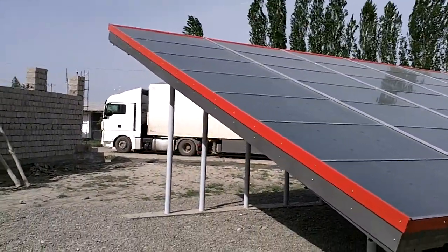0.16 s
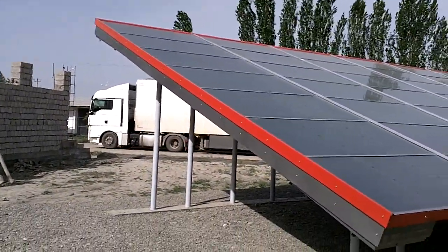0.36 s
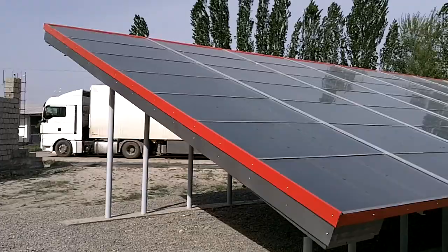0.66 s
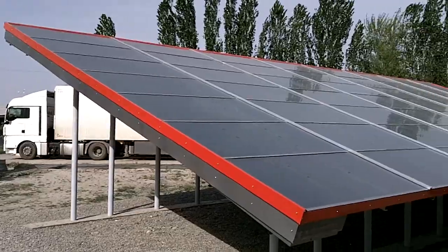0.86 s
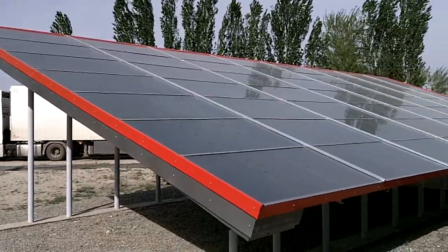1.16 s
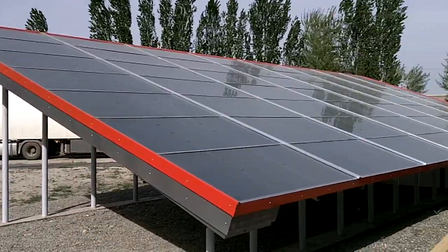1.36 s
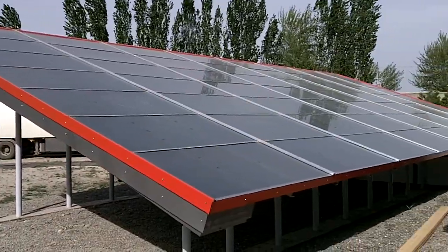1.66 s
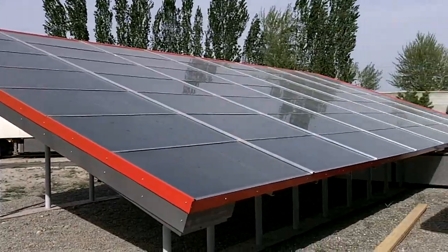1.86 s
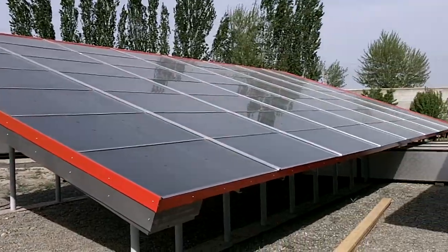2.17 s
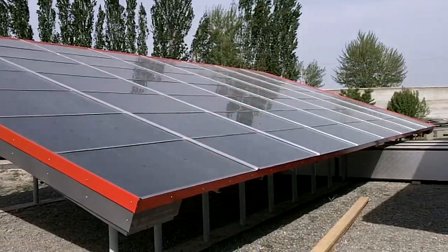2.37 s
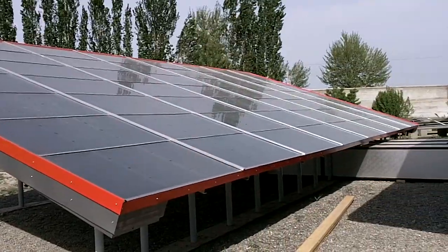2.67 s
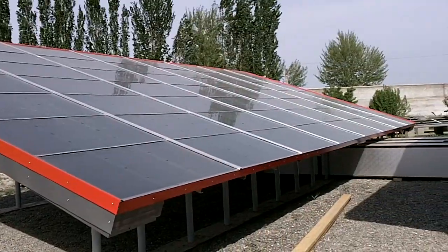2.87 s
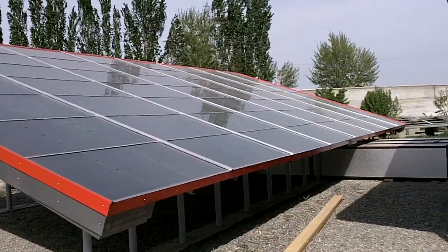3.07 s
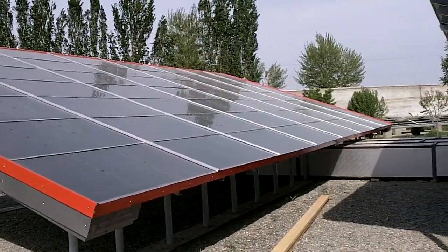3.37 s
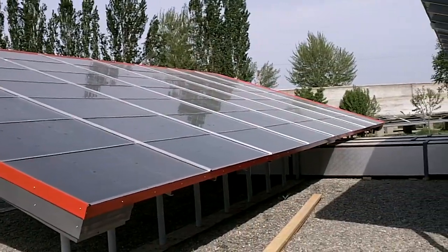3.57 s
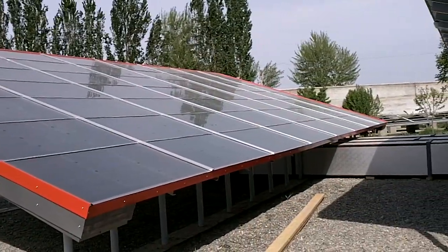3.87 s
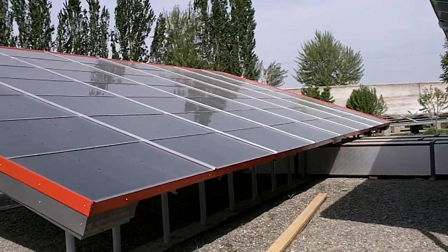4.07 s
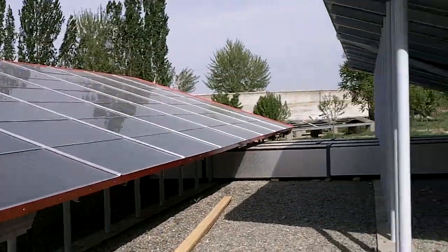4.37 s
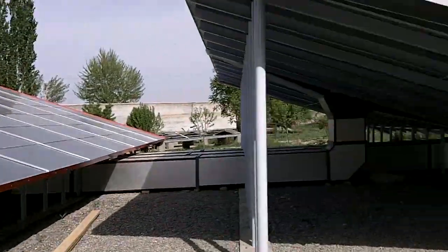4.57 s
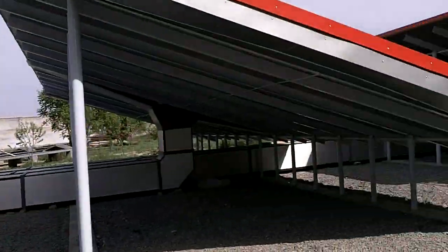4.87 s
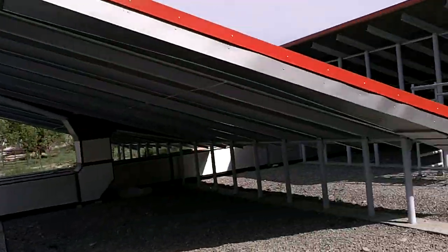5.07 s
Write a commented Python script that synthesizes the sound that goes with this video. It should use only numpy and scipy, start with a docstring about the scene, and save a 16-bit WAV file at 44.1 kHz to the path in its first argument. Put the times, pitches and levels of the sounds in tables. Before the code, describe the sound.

Near solar panels in a gravel yard, faint hiss and wind open the scene, with barely audible distant tones. Seven short, hollow, footstep-paced knocks follow from 1.7 to 4.9 seconds, mostly growing stronger, with brief rattling bounces and a short open-air tail. One microphone picks up a gust midway and rough, booming wind bursts in the last half second.

```python
"""A windy yard: seven hollow thuds sound, as on a frame clad with a thin sheet.
Each thud is a slow swinging boom plus quick ringing modes, with a blow and three bounces.
Weaker repeats first carry on the boom's ring, then echo it; a scattered tail and low shudder follow.
Wind noise rumbles, flutters and bursts on one microphone; notched hiss and faint tones lie behind.
"""
import sys
import numpy as np
from scipy import signal
from scipy.fft import rfft, irfft, next_fast_len
from scipy.io import wavfile
from scipy.ndimage import uniform_filter1d

SR = 44100
rng = np.random.default_rng(int(sys.argv[2]) if len(sys.argv) > 2 else 0)


def pcm_store(signal):
    """Save signal as 16-bit PCM."""
    levels = np.round(np.clip(np.atleast_2d(signal), -1, 1) * 32767)
    wavfile.write(sys.argv[1], SR, levels.astype(np.int16).T)


N = 230554

# The seven thuds: t/s, boom level/dB, crack level/dB, clack level/dB, treble change of the repeats/dB,
# tilt of the quick modes/(dB per octave), bounce change/dB, change of the upper boom modes/dB
THUDS = [(1.6682, -31, -34, -35.5, -7, -1, .5, 0), (2.382, -27.5, -23.5, -31, -1, 1, -0.3, -5),
         (2.89, -26.5, -25.5, -31, 3, -0.5, 1, -2), (3.3725, -25.5, -34, -29.5, 0.5, 0, 3.5, 1),
         (3.869, -24.5, -23.5, -28, 5.5, 0.8, 0.5, 1), (4.375, -23, -18.5, -28.5, 3, -0.2, .1, 1),
         (4.873, -22, -25.5, -35, -0.5, -4, 4, 0.3)]
# Slow modes of the sheet: f/Hz, level/dB, time of greatest swing/s
BOOM_MODES = [(112.7, 2, 0.011), (198, -13, 0.021), (301, -15.5, 0.014), (398.4, -16.5, 0.0094),
              (462, -13.5, 0.011), (565.6, -14, 0.011)]
# Lower quick modes: f/Hz, level/dB, time to fall 60 dB/s
CLACK_MODES = [(668, 2.5, 0.044), (757, -3, 0.043), (906, 0.5, 0.037), (973, -0.5, 0.06),
               (1102, 3.5, 0.029), (1198, 0, 0.047), (1397, -2, 0.055)]
# Higher quick modes: f/Hz, level/dB, time to fall 60 dB/s
CRACK_MODES = [(1535, 2.5, 0.016), (1670, -34, 0.015), (1795, -4.5, 0.058), (1915, 0, 0.033),
               (2017, 1.5, 0.021), (2150, 3, 0.016), (2350, -10, 0.068), (3285, -8, 0.021)]
# The blow and its bounces: t after the blow/s, level/dB
CONTACTS = [(0, 2.4), (.0065, -1.5), (.0215, -11.5), (0.04, -13)]
# Delays of weaker repeats: the first two carry on the boom's ring, later ones are echoes: t/s
REPEAT_DELAYS = [.036, .072, .137, .19]
# Strength of those repeats, in the same order: boom level/dB, treble level/dB
REPEAT_LEVELS = [(-14, -35), (-13.5, -19), (-13.5, -16.5), (-23.5, -29)]
# Scattered tail of the yard: f/Hz, level/dB, time to fall 60 dB/s
YARD_TAIL = [(100, -31, 0.69), (198, -13.5, 0.38), (400, -11, 0.2), (700, -9.5, 0.1), (1510, -10, 0.51),
             (3000, -8.5, 0.79)]
# Slowly changing wind on the microphone, strongest near the end: t/s, rumble level/dB
WIND_STRENGTH = [(0, -52.5), (1.5, -52), (1.95, -49), (2.3, -51), (2.9, -46), (3.3, -40.5), (3.8, -44),
                 (4.4, -47.5), (4.75, -38), (5.0, -28.5), (5.23, -31)]
# Gusts riding on the wind: t of greatest strength/s, rumble level/dB, length/s
GUSTS = [(.04, -47.5, .04), (3.109, -43, 0.033), (3.244, -35.5, 0.066), (3.502, -45, 0.094),
         (4.238, -44.5, 0.044), (4.69, -50, 0.064), (4.921, -23, 0.1), (5.022, -25, 0.033),
         (5.129, -26, .04), (5.177, -23, .04)]
# Colour of the wind rumble: f/Hz, level/dB
RUMBLE_COLOUR = [(12, -12.5), (25, 1), (50, -4.5), (80, -4.5), (120, -12.5), (200, -20.5)]
# Colour of the flutter and the shudder: f/Hz, level/dB
FLUTTER_COLOUR = [(40, -28), (90, -3), (150, 0.9), (300, -5.5), (500, -11), (900, -25)]
# Single eddies on the microphone port: t of peak/s, peak level/dB, length/s, push +1 or pull -1
BUFFETS = [(0.202, -35, 0.0075, 1), (4.838, -18.5, 0.0034, 1), (4.92, -16, 0.0046, 1),
           (4.938, -19, 0.0082, -1), (5.002, -17, 0.0024, -1), (5.021, -17, 0.0038, -1),
           (5.027, -16.5, 0.0045, 1), (5.115, -15.5, 0.0058, -1), (5.131, -14, 0.0023, -1),
           (5.173, -11.5, 0.0046, -1), (5.188, -15, 0.0133, 1)]
# Strength of the hiss: t/s, bright level/dB, dull level/dB
HISS_LEVELS = [(0.0, -49, -49.5), (0.48, -48.5, -49), (1.92, -50, -49.5), (2.21, -49, -50),
               (4.32, -48, -49), (5.01, -44.5, -47.5), (5.23, -45, -47)]
# Colour of the bright hiss: f/Hz, level/dB
BRIGHT_COLOUR = [(1500, -13), (2600, -10), (3300, -4), (4400, -0.05), (4950, -3.5), (5200, -18),
                 (6000, -16), (6800, -18), (7600, -31.5), (9000, -29), (11500, -26), (13500, -31),
                 (15000, -28)]
# Colour of the dull hiss: f/Hz, level/dB
DULL_COLOUR = [(40, -10), (100, -3.5), (300, -1), (800, -2.4), (1500, -4.5), (2400, -7), (3500, -68)]
# Faint tones of fixed pitch: start t/s, end t/s, f/Hz, level/dB
HOOTS = [(0.346, 0.594, 709, -57.5), (0.96, 1.094, 712, -62.5), (1.223, 1.357, 417, -56)]
# Notches in the microphone path: f/Hz, width/Hz, width of the bottom/Hz
NOTCHES = [(2735, 500, 45), (5500, 260, 40), (8000, 500, 250), (10900, 500, 20), (11000, 500, 20)]

# Sheet snaps back, its swing is damped, and the time scale of that damping
SNAP_S, DAMPED_S, DAMPING_S = .0138, .034, .002
CRACK_LEAD_S = .0008  # the quick modes start this much before the boom
TILT_HZ = 1200  # the tilt turns about this pitch
SHUDDER_DB, SHUDDER_T60_S = -12, 0.75  # level against the boom, time to fall 60 dB
# Flutter stays faint until the rumble passes a level, then climbs (slope in dB per dB)
FLUTTER_CALM_DB, FLUTTER_FROM_DB, FLUTTER_SLOPE = -54.5, -37.5, 1.22
EDGE_HZ = 15150  # upper band limit


def gain_of(db):
    """Turn decibels into a plain factor."""
    return 10 ** (np.asarray(db) / 20)


def evened(x):
    """Scale a signal to an average (RMS) strength of one."""
    return x / np.sqrt(np.mean(x ** 2) + 1e-20)


def read(points, hz, column=1):
    """Read a table at any pitch, in straight lines over log pitch, level beyond its ends."""
    rows = np.transpose(points)
    return np.interp(np.log(hz + 1), np.log(rows[0] + 1), rows[column])


def curve(points, column):
    """Read a table over time, one value per sample."""
    rows = np.transpose(points)
    return np.interp(np.arange(N) / SR, rows[0], rows[column])


def add(mix, s, sound):
    """Add a sound to the mix from time s on, cutting what runs past the end."""
    part = mix[round(s * SR):][:len(sound)]
    part += sound[:len(part)]


def noise(spectrum):
    """Steady noise of the given colour, falling away steeply beyond the last point."""
    size = next_fast_len(N)
    hz = np.fft.rfftfreq(size, 1 / SR)
    colour = gain_of(read(spectrum, hz)) / (1 + (hz / spectrum[-1][0]) ** 8)
    white = rfft(rng.standard_normal(N), size)
    return evened(irfft(white * colour, size)[:N])


def lumps(per_s):
    """Slow random wander of unit spread: noise averaged twice over 1 / per_s seconds."""
    size = max(round(SR / per_s), 1)
    once = uniform_filter1d(rng.standard_normal(N), size)
    return evened(uniform_filter1d(once, size))


def thuds():
    """Direct sound, weaker repeats with changed treble, and the scattered tail."""
    direct, repeats = np.zeros(N), np.zeros(N)
    for s, boom_db, crack_db, clack_db, treble_db, tilt_db, bounce_db, upper_db in THUDS:
        low = gain_of(boom_db) * boom(upper_db)
        crack = gain_of(crack_db) * ring(CRACK_MODES, tilt_db, bounce_db)
        clack = gain_of(clack_db) * ring(CLACK_MODES, tilt_db, bounce_db)
        high = crack + clack
        add(direct, s - CRACK_LEAD_S, high)
        add(direct, s, low)
        for delay, (low_db, high_db) in zip(REPEAT_DELAYS, REPEAT_LEVELS):
            add(repeats, s + delay, gain_of(low_db) * low)
            add(repeats, s + delay - CRACK_LEAD_S, gain_of(high_db + treble_db) * high)
    return direct + repeats + yard(direct)


def boom(upper_db):
    """Slow modes swell, all swing inward together as the sheet snaps back, and are damped."""
    t = np.arange(round(2 * DAMPED_S * SR)) / SR
    swing = np.zeros(len(t))
    for hz, db, top in BOOM_MODES:
        is_upper = hz > BOOM_MODES[0][0]
        swell = t / top * np.exp(1 - t / top)  # reaches one at the time "top"
        swing -= gain_of(db + upper_db * is_upper) * swell * np.cos(2 * np.pi * hz * (t - SNAP_S))
    return np.sqrt(2) * swing / (1 + np.exp((t - DAMPED_S) / DAMPING_S))


def ring(modes, tilt_db, bounce_db):
    """The blow and its bounces each set the quick modes ringing with new phases."""
    t, out = np.arange(3000) / SR, np.zeros(6000)
    phases = rng.uniform(-1.6, 1.8, (len(CONTACTS), len(modes)))
    attack = np.minimum(t / 0.00042, 1)
    for (s, blow_db), row in zip(CONTACTS, phases):
        rung = np.zeros(len(t))
        for (hz, db, t60), phase in zip(modes, row):
            tilted_db = db + tilt_db * np.log2(hz / TILT_HZ)
            rung += gain_of(tilted_db - 60 * t / t60) * np.cos(2 * np.pi * hz * t + phase)
        contact_db = blow_db + bounce_db * (s > 0)  # the change spares the first blow
        add(out, s, gain_of(contact_db) * rung * attack)
    return out / np.sqrt(len(modes))


def yard(x):
    """Sparse reflections of random sign, each band dying at its own speed."""
    taps = np.zeros(SR)
    at = np.arange(600, SR - 20, 20)
    taps[at + rng.integers(0, 20, len(at))] = rng.choice([-1., 1.], len(at))
    hz, t, bands = signal.stft(taps, SR, nperseg=512)
    t60 = read(YARD_TAIL, hz, column=2)[:, None]
    fading = gain_of(read(YARD_TAIL, hz)[:, None] - 60 * t / t60)
    bands = bands * fading / np.sqrt(t60 * SR / 20 / 27.0)  # slow decays gain no extra energy
    tail = signal.istft(bands, SR, nperseg=512)[1]
    return signal.fftconvolve(x, tail)[:N]


def shudder():
    """Each thud leaves a low, lumpy noise that dies away."""
    level, t = np.zeros(N), np.arange(SR // 2) / SR
    for s, boom_db, *_ in THUDS:
        add(level, s, gain_of(boom_db + SHUDDER_DB - 60 * t / SHUDDER_T60_S))
    return level * evened(noise(FLUTTER_COLOUR) * gain_of(2.4 * lumps(49)))


def wind():
    """Lumpy rumble and quicker flutter, with single eddies bursting on the port."""
    t = np.arange(N) / SR
    strength = gain_of(curve(WIND_STRENGTH, 1))
    for s, db, length in GUSTS:
        strength += gain_of(db) * np.exp(-(2 * (t - s) / length) ** 2)
    excess_db = np.maximum(20 * np.log10(strength) - FLUTTER_FROM_DB, 0)
    flutter_db = FLUTTER_CALM_DB + FLUTTER_SLOPE * excess_db
    rumble = strength * evened(noise(RUMBLE_COLOUR) * gain_of(1.7 * lumps(26)))
    flutter = gain_of(flutter_db) * evened(noise(FLUTTER_COLOUR) * gain_of(1.5 * lumps(40)))
    return rumble + flutter + buffets()


def buffets():
    """Each eddy is a pressure pulse with a smaller swing the other way on both sides."""
    bursts = np.zeros(N)
    for s, db, length, push in BUFFETS:
        u = np.arange(-3, 3, 1 / (length * SR)) * 2  # time from the peak, in half lengths
        pulse = (1 - 0.58 * u ** 2) * np.exp(-u ** 2 / 2)
        add(bursts, s - 3 * length, np.sign(push) * gain_of(db) * pulse)
    return bursts


def hiss():
    """Smooth broad hiss of leaves and microphone: bright and dull noise, each with its own level."""
    bright = gain_of(curve(HISS_LEVELS, 1)) * noise(BRIGHT_COLOUR)
    dull = gain_of(curve(HISS_LEVELS, 2)) * noise(DULL_COLOUR)
    return bright + dull


def hoots():
    """Faint far tones: sine waves that swell and fade."""
    out = np.zeros(N)
    for start, end, hz, db in HOOTS:
        t = np.arange(0, end - start, 1 / SR)
        swell = signal.windows.tukey(len(t), .5)
        add(out, start, np.sqrt(2) * gain_of(db) * np.sin(2 * np.pi * hz * t) * swell)
    return out


def scene():
    """Add all sources at one microphone, which feeds both channels."""
    return np.tile(thuds() + shudder() + wind() + hiss() + hoots(), (2, 1))


def record(dry):
    """Notches in the microphone path, the left channel one sample late, then the band limit."""
    out = dry
    both_signs = np.array([1, -1])
    for hz, width, bottom in NOTCHES:
        # zeros carve the dip; poles confine it to the given width
        zeros = np.exp((2j * hz * both_signs - bottom) * np.pi / SR)
        poles = np.exp((2j * hz * both_signs - width) * np.pi / SR)
        out = signal.lfilter(np.poly(zeros).real, np.poly(poles).real, out)
    out = np.array([np.r_[0, out[0, :-1]], out[1]])
    low_pass = signal.firwin(511, EDGE_HZ, window=("kaiser", 9), fs=SR)
    return signal.oaconvolve(out, low_pass[None], "same")


dry = scene()
out = record(dry)
pcm_store(out)
```